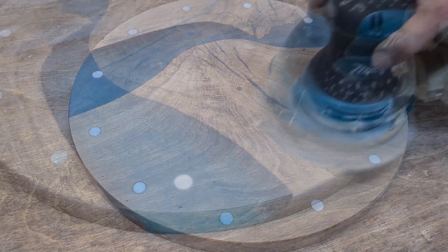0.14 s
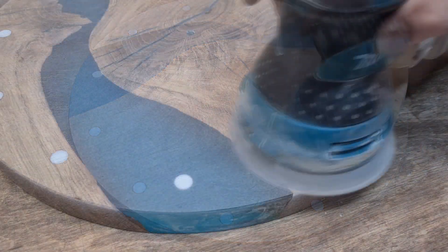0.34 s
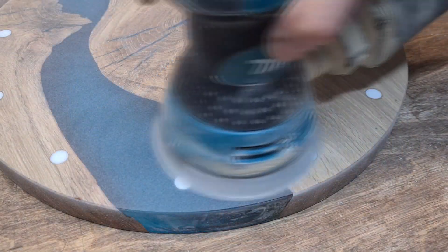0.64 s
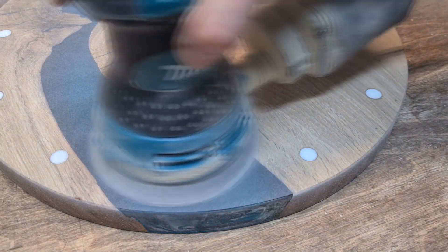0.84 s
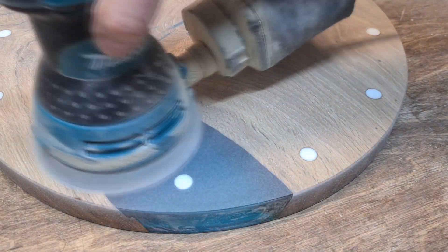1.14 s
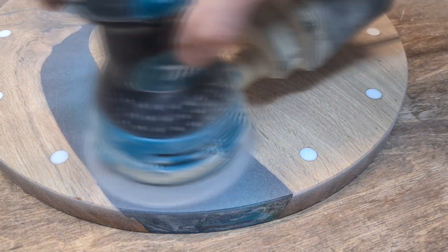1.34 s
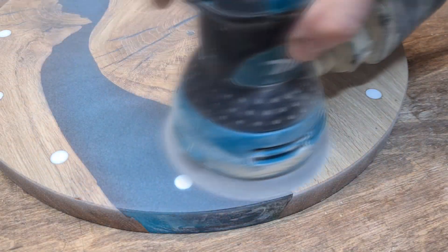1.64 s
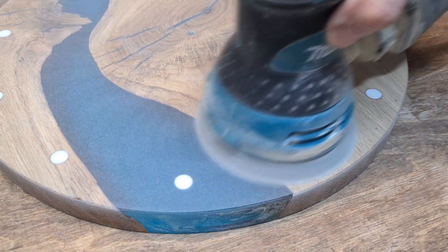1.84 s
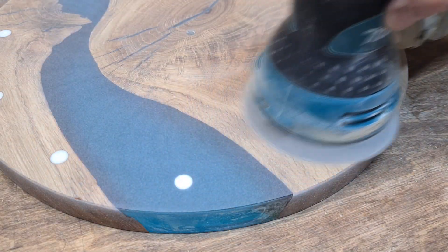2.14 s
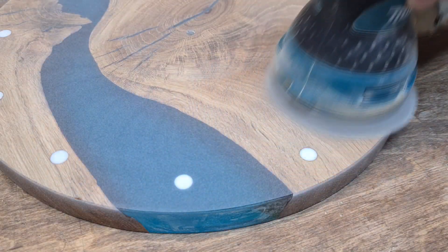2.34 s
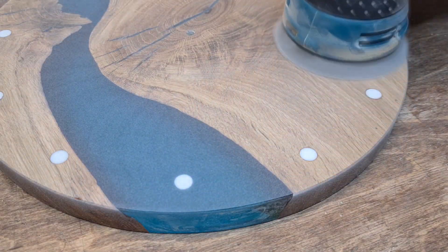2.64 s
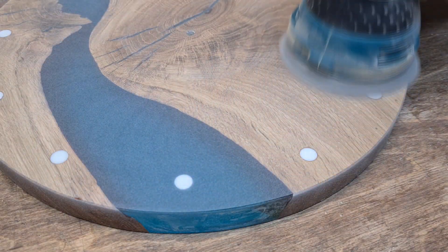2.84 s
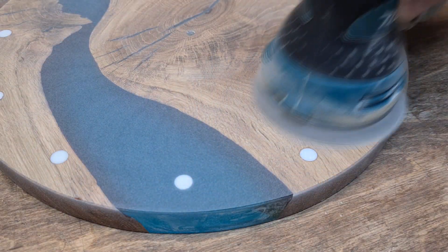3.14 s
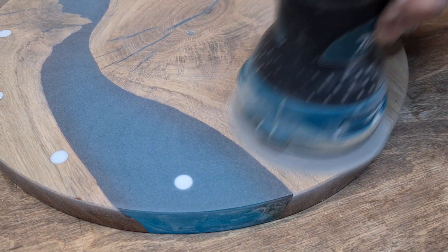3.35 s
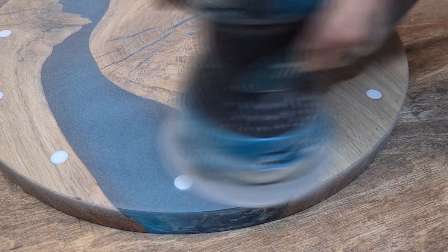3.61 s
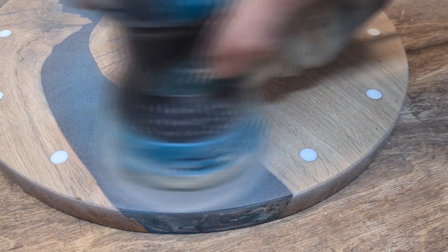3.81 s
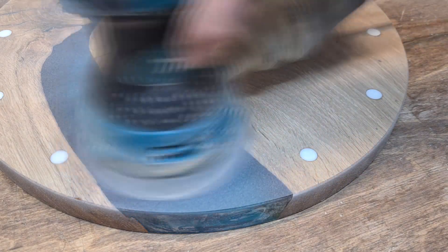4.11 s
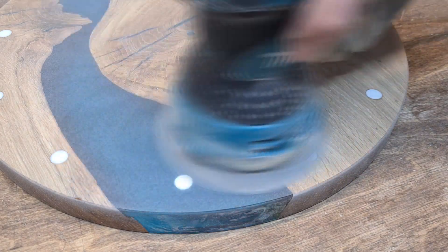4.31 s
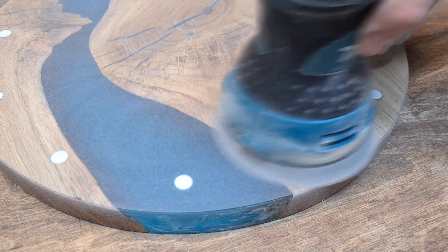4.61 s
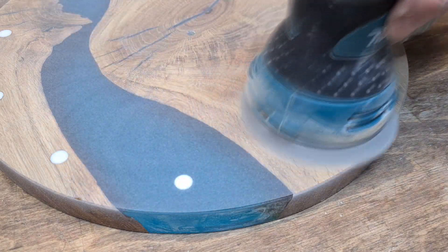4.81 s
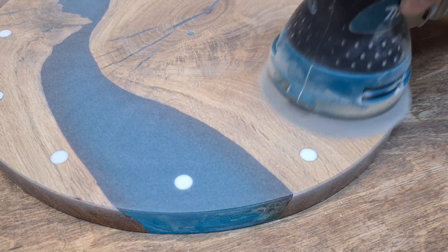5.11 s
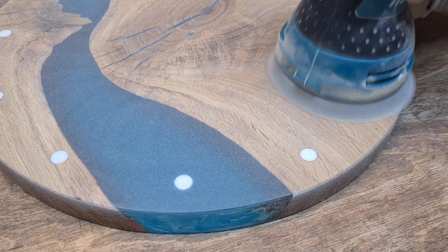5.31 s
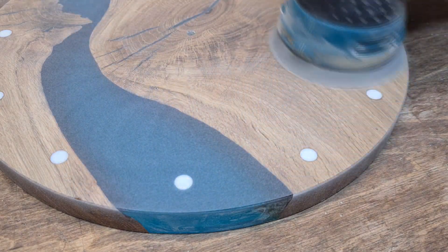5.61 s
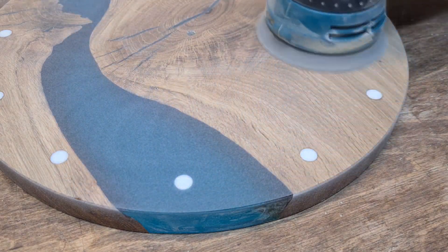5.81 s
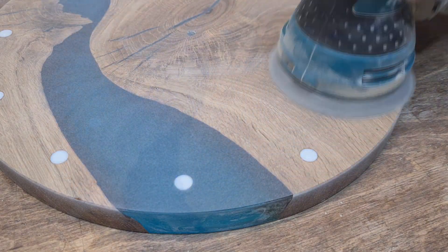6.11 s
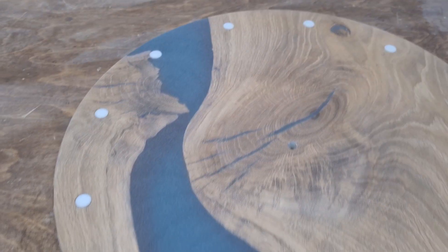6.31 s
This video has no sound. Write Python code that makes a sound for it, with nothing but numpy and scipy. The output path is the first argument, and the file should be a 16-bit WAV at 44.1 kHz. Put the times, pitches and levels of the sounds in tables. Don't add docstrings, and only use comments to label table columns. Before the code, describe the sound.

A handheld electric orbital sander is running from the first instant, close to a stereo microphone on a workshop bench. For the first 0.5 s a slightly slower, lower-pitched layer of the same tool dissolves beneath it, giving a brief beating. Then a steady buzzing hum around 200 Hz continues, with a hard whine near 4.8 kHz, fainter fan tones, fuzzy pad chatter and broad gritty hiss reaching into the treble. Around 1.1 s the tool is at the left and the low hum is strongest; by 2.4-2.8 s it is at the right rim, hissier and leaning right, its pitch sagging very slightly. It sweeps left again around 3.9 s and returns right by 4.8 s. The whine flickers and shifts sides throughout. From 5 s everything fades smoothly, gone by about 6.2 s, leaving a very faint low rumble of a quiet room.

```python
import sys
import numpy as np
from scipy import signal
from scipy.io import wavfile
from scipy.ndimage import uniform_filter1d, map_coordinates

SR = 44100
rng = np.random.default_rng(int(sys.argv[2]) if len(sys.argv) > 2 else 0)


def voltage_ratio(level):
    return 10 ** (np.asarray(level, float) / 20)


def to_wav(sig):
    pcm = np.clip(np.atleast_2d(sig), -1, 1) * 32767
    pcm = np.round(pcm).astype(np.int16)
    wavfile.write(sys.argv[1], SR, pcm.T)


N = 284886
TIME = np.arange(N) / SR

# start_s, place (0 left on the board - 1 right rim)
PLACE_PATH = [(0, 0.74), (.4, 0.54), (1.1, 0.0096), (1.5, 0.24), (2, 0.69), (2.4, 0.86), (2.8, 0.95),
              (3.3, 0.76), (3.9, 0.018), (4.3, 0.43), (4.8, 0.81), (5.3, .98), (6.2, 0.91)]
# place, width (place), gain_db
RESIN_SEAM = (.58, .33, 3.5)


def unit(x):
    return x / np.sqrt(np.mean(x ** 2) + 1e-20)


def along(points, hz):
    f, v = np.transpose(points)
    return np.interp(np.log(hz + 1), np.log(f + 1), v)


def curves(rows):
    s, *cols = np.transpose(rows)
    return [np.interp(TIME, s, c).astype(np.float32) for c in cols]


def wobble(rate_hz):
    draws = rng.standard_normal(int(N * rate_hz / SR) + 4)
    knots = map_coordinates(draws, [TIME[::64] * rate_hz])
    return np.repeat(knots.astype(np.float32), 64)[:N]


def bump(x, centre, width):
    return np.exp(-np.square(np.square(1.8 * (x - centre) / width))).astype(np.float32)


def humps(rows):
    coarse_s = TIME[::64]
    sums = sum(np.outer(heights, bump(coarse_s, s, length_s)) for s, length_s, *heights in rows)
    return np.repeat(sums.astype(np.float32), 64, axis=1)[:, :N]


def gain_of(db):
    return np.repeat(voltage_ratio(db[..., ::16]).astype(np.float32), 16, axis=-1)[..., :N]


def pan(db):
    return voltage_ratio(np.array([db / 2, -db / 2]))


def tone(turns, lead_rad):
    angle = (2 * np.pi * (turns % 1)).astype(np.float32)
    return np.float32(np.sqrt(2)) * np.sin([angle + lead_rad / 2, angle - lead_rad / 2])


def rush(spectrum, patchy_db, seam_db=0):
    # hz, left-right likeness (0-1)
    alike = [(50, .12), (100, .25), (200, 0.76), (600, 0.93), (1400, .45), (3000, 0.17), (7000, 0.15),
             (15000, 0.098)]
    hz, t, z = signal.stft(rng.standard_normal((2, N), dtype=np.float32), SR, nperseg=1024)
    field = uniform_filter1d(rng.standard_normal(z.shape[1:]), size=10, axis=0)
    field = uniform_filter1d(field, size=6, axis=1)
    spot = np.interp(t, *np.transpose(PLACE_PATH))

    seam_place, seam_width, _ = RESIN_SEAM
    seam_hz = 7350 + 2500 * (spot - seam_place)
    seam = bump(spot, seam_place, seam_width) * bump(hz[:, None], seam_hz, 1500)
    z = z * voltage_ratio(along(spectrum, hz)[:, None] + seam_db * seam + patchy_db * unit(field))

    turn = np.arccos(np.clip(along(alike, hz), 0, 1))[:, None] / 2
    shared, own = z[0] * np.cos(turn), z[1] * np.sin(turn)
    lag_s = (-6 + 10.86 * spot) / SR
    late = np.exp(-1j * np.pi * hz[:, None] * lag_s)
    ports = np.array([(shared + own) * late, (shared - own) / late])
    return unit(signal.istft(ports, nperseg=1024)[1][:, :N])


def across(place):
    place_levels = [(0, -49, -39, -32, -39.5), (.35, -46.5, -45, -37.5, -32.5),
                    (.7, -39, -45.5, -39.5, -26.5), (.85, -32.5, -51, -34.5, -26),
                    (1, -27.5, -41.5, -37.5, -29.5)]
    spot, *cols = np.transpose(place_levels)
    return [np.interp(place, spot, c).astype(np.float32) for c in cols]


def rubbing(place):
    # place, width (place), gain_db
    vent_place, vent_width, vent_db = (.79, .2, 2.6)
    seam_place, seam_width, seam_db = RESIN_SEAM
    reach = np.clip(place / 0.61, 0, 1)
    chatter_db = -36 + 1.5 * reach
    scratch_db = -43 + 2.5 * reach
    grit_db = -39.5 + 0.16 * seam_db * bump(place, seam_place, seam_width)
    air_db = -38.5 + vent_db * bump(place, vent_place, vent_width)
    return chatter_db, scratch_db, grit_db, air_db


def hum(turns, place):
    # start_s, order1_db
    shake = [(0.0, -30), (0.3, -22.5), (0.55, -20), (1.29, -20), (1.8, -25.5), (2.3, -27.5), (2.54, -24.5),
             (2.76, -33.5), (3.1, -27), (3.5, -22), (3.97, -20), (4.5, -26), (5.0, -29), (5.7, -29),
             (5.95, -31.5), (6.17, -24.5)]
    # centre_s, length_s, order2_db, order3_db
    rim_rings = [
        (2.5, 0.44, 0.5, 7),
        (3.72, 0.515, 4, -2),
        (4.15, 0.34, 0.5, 2.5),
        (5.45, 0.11, 0, 1.5),
        (5.85, 0.7, -1, 4.5),
    ]
    second_db, third_db = across(place)[:2] + humps(rim_rings)
    side, lead_rad = pan(-.3 - 5.1 * place), -.4 - 0.65 * place

    first_db = curves(shake)[0] + .4 + .5 * wobble(28)
    first = voltage_ratio(first_db) * side * tone(turns + 0.0027 * wobble(20), lead_rad)
    rock_turns = turns - 7.4 * (TIME - 1.92) + .5
    rock = voltage_ratio(-39.5 + .8 * wobble(3)) * side * tone(rock_turns, lead_rad)

    board = voltage_ratio(second_db + 2.73 + 1.2 * wobble(25)) * tone(2 * turns, 0)[0]
    body_db = rubbing(place)[1] - 1.0 - 11.5 * bump(place, 0.94, 0.1) + 1.5 * wobble(12)
    body = voltage_ratio(body_db) * tone(2 * turns, 7.1 * (1.05 - place))[0]
    second = np.array([board + body, board - body])

    third_gain = voltage_ratio(third_db + 2.2 + 1.6 * wobble(20)) * pan(4.5 - 6 * place)
    third = third_gain * tone(3 * turns + 0.04 * wobble(16), 1.2 - 1.5 * place)
    return first + rock + second + third


def whine(turns, place):
    # centre_s, length_s, left_db, right_db
    echoes = [(.08, .2, -9.5, -7), (.38, .15, 0, -28), (.73, .12, -22, -6), (.83, .07, -10.5, 1),
              (.94, .07, -2.5, -15.5), (1.42, .18, -17.5, -7.5), (1.56, .1, 0, 4.5),
              (1.96, .12, -12.5, -5.5), (2.21, 0.074, -2, -8), (2.1, .14, 2.5, -4), (2.32, .12, 0.5, 1),
              (2.44, .06, -11.5, -14), (2.58, .1, -9.5, -9), (2.91, 0.11, -3.5, -5), (3.35, .3, 2, 2),
              (3.66, .08, -5.5, -0.5), (3.82, .1, -15.5, 6), (3.9, .06, -8, -17), (4.18, .12, -23, -1.5),
              (4.5, .1, 7, 1.5), (5.28, .12, -14.5, -6), (5.42, .03, -7, -16), (5.5, .08, -1, 5),
              (5.6, .08, -8, -0.5), (5.79, .05, 2, -7), (5.92, .06, -13, -5), (5.99, 0.064, 2, 6.5),
              (6.13, 0.23, -8, -8), (4.05, .08, -1, -7)]
    # centre_s, length_s, extra_left_lead_rad
    twists = [
        (.48, .25, -1.3),
        (.83, .2, 2.6),
        (1.1, .25, -1.1),
        (1.36, .12, 2.2),
        (1.82, .3, 1),
        (3.85, .1, 1.6),
        (4.1, .15, 2),
        (5.15, .5, .6),
    ]
    left_db, right_db = across(place)[2:] + humps(echoes)
    lead_rad = 7.6 + (2.7 - 7.6) * place + humps(twists)[0]
    level_db = np.array([left_db + .7 * wobble(30), right_db + .7 * wobble(30)])
    return voltage_ratio(level_db) * tone(24 * turns, lead_rad)


def fan(turns, place):
    # centre_s, length_s, swell_db
    swells = [
        [(.42, .4, 4.5), (1.75, 0.79, 7), (2.35, 0.27, 7.5), (2.9, .3, 8.5), (3.45, 0.4, 6), (4.55, 0.7, 8),
         (5.3, .35, 5.5)],
        [(.5, 0.98, 14), (1.04, .12, 11), (1.68, 0.91, 16.5), (2.66, 0.14, 16), (3.05, 0.18, 13),
         (3.45, 0.37, 10.5), (4.4, 0.66, 13.5), (5.3, 0.38, 8.5), (5.85, .2, 12)],
        [(.5, .4, 10), (1.7, 0.47, 9), (2.25, .3, 8.5), (3.62, .2, 10), (4.01, .15, 7), (4.85, .9, 8)],
        [(.64, 0.25, 11.5), (.88, 0.15, 11), (1.27, .16, 14), (1.7, .45, 12.5), (2.38, .15, 10), (2.8, 0.77, 7),
         (3.85, 0.59, 11), (4.28, .2, 10), (5.05, .5, 10.5), (5.85, 0.62, 14)],
    ]
    calm_db = [-47, -52.5, -53, -50]
    # order, pan_left_db, pan_rim_db (left minus right), lead_left_rad, lead_rim_rad
    sides = [(12, 4, -2.5, 2.9, -1), (18, -8, -13, 3.3, -3.5), (23, -19, -13.5, 1, 2), (48, -2, -5, .3, 2)]
    lines = 0
    for db, rows, (order, pan_left, pan_rim, lead_left, lead_rim) in zip(calm_db, swells, sides):
        level_db = db + humps(rows)[0] - 4.0 + 1.8 * wobble(14)
        side = pan(pan_left + (pan_rim - pan_left) * place + 1.5 * wobble(1.5))
        lead_rad = lead_left + (lead_rim - lead_left) * place + 0.72 * wobble(3)
        lines = lines + gain_of(level_db) * side * tone(round(order) * turns, lead_rad)
    return lines


def weak_orders(turns, place):
    # order, left_db, right_db (re scratch level)
    minor_lines = [(3.967, -4, -14.5), (4.996, -11.5, -8), (6, -5, -3.5), (8, -22.5, -8), (9, -7.5, -17.5),
                   (12.5, -6.5, -19.5), (15.94, -9, -6.5), (16.78, -10, -4), (18.93, -26, -13),
                   (19.45, -23, -9.5), (20.45, -14.5, -6), (22, -14.5, -12), (24.6, -14.5, -19.5),
                   (35.4, -20, -30.5), (37.4, -11.5, -12), (47.2, -10, -12), (48.6, -20.5, -21.5),
                   (50, -23, -13)]
    base_db = rubbing(place)[1]
    lines = 0
    for order, left_db, right_db in minor_lines:
        fading_db = 2.5 * np.array([wobble(5), wobble(6.6)])
        shaky = round(2 * order) / 2 * turns + 0.054 * wobble(22)
        gain = gain_of(base_db + fading_db + np.float32([[left_db], [right_db]]))
        lines = lines + gain * tone(shaky, order * -.1 + 0.49 * wobble(3.05))
    return lines


def pad_knocks(turns, place):
    pad_orders = [(1, -8.5), (2, -14.5), (3, -11), (4, -12.5), (5, -13.5), (6, -11), (7, -14), (8, -18.5)]
    slip = turns - np.cumsum(6.2 + 1.426 * wobble(4), dtype=float) / SR
    base_db = rubbing(place)[0]
    knocks = 0
    for order, db in pad_orders:
        fuzzy = round(order) * slip + .1 * np.sqrt(order) * wobble(26)
        gain = gain_of(base_db + db + 4.14 * wobble(24))
        knocks = knocks + gain * tone(fuzzy, -.3 + 0.9 * wobble(6))
    return knocks


def abrasive(turns, place):
    # hz, level_db
    rumble_bands = [(15, -29.5), (30, -24.5), (80, -7), (100, 0), (125, -5.5), (160, 4.5), (200, 2.5),
                    (240, 8), (270, 1.5), (310, -4.5), (480, 0.5), (600, -21.5), (900, -58)]
    chatter_bands = [(250, -59.5), (400, -27), (520, -5.5), (700, -0.5), (1000, 1.5), (1250, 5),
                     (1420, 1.5), (1500, -6.5), (1800, -23.5), (3000, -60.5)]
    scratch_bands = [(1100, -20), (1500, 0.5), (2000, 3), (3000, 1.5), (4300, 1), (5000, 1.5), (5600, -29)]
    grit_bands = [(4400, -20.5), (5200, -2), (6200, -1), (7100, 1), (7700, -3), (8400, -7), (9500, -12),
                  (10600, -32.5)]
    air_bands = [(8000, -22.5), (9300, -4), (11300, -2.5), (12200, 1.5), (14000, -0.5), (15800, -0.5),
                 (16200, -58.5)]
    chatter_db, scratch_db, grit_db, air_db = rubbing(place)
    flutter = wobble(14)
    orbit = 1 + .02 * np.sin(2 * np.pi * turns)

    chatter_gain = voltage_ratio(chatter_db - 1.5 + 0.55 * flutter + 0.74 * wobble(25)) * pan(.3 - 1.0 * place)
    chatter = chatter_gain * rush(chatter_bands, patchy_db=0.5)
    scratch_gain = voltage_ratio(scratch_db + 7.5 + .5 * flutter) * pan(-.5 - 2.17 * place)
    scratch = scratch_gain * rush(scratch_bands, patchy_db=0.88)
    grit_gain = voltage_ratio(grit_db + 6.0 + .5 * flutter) * pan(-.7 - 3 * place)
    grit = grit_gain * rush(grit_bands, patchy_db=0.97, seam_db=RESIN_SEAM[2])
    air_gain = voltage_ratio(air_db + 4.5 + 0.25 * flutter + .3 * wobble(6.6)) * pan(-2.5 - 4.2 * place)
    air = air_gain * rush(air_bands, patchy_db=1.8)
    rumble = voltage_ratio(chatter_db - 12.0) * pan(-.4)[:, None] * rush(rumble_bands, patchy_db=-1.1)
    return orbit * (chatter + scratch + grit + air) + rumble


def earlier_shot():
    # order, left_db, right_db, left_lead_rad, head_start_turns
    earlier_orders = [(1, -29, -22.5, 0.33, 0.65), (2, -47, -32.5, 2.9, 0.61), (18, -42.5, -38.5, -1.7, 0),
                      (24, -39.5, -33.5, 1.3, 0.03), (47, -55.5, -42, 1.8, 0), (48, -48, -45, 1, 0.11)]
    fade = np.clip(1 - (TIME / .5) ** 2, 0, 1)
    turns = 197.6 * TIME
    lines = 0
    for order, left_db, right_db, lead_rad, start in earlier_orders:
        gain = gain_of(0.55 * wobble(17) + [[left_db], [right_db]])
        lines = lines + gain * tone(round(order) * turns + start, lead_rad + 0.56 * wobble(6.9))
    return fade * lines


def room():
    # hz, level_db
    quiet_bands = [(12, -61.5), (22, -25), (43, -1.5), (65, 1), (80, -3), (110, -18), (190, -22),
                   (260, -38), (1000, -43), (4400, -120)]
    fade_in = np.clip((TIME - 6.16) / .08, 0, 1)
    return fade_in * voltage_ratio(-66.0 + 1.5 * wobble(8)) * rush(quiet_bands, patchy_db=-0.5)


def scene():
    # start_s, shaft_turns_per_s
    shaft_speed = [(0.03, 202.23), (0.69, 202.56), (1.13, 202.98), (1.35, 202.75), (1.79, 201.5),
                   (2.23, 200.57), (2.45, 199.87), (2.67, 200.66), (3.33, 200.85), (3.77, 201.62),
                   (3.99, 202.29), (4.21, 202.24), (4.43, 201.47), (5.09, 200.07), (5.53, 198.96),
                   (5.75, 199.3), (5.97, 199.85), (6.13, 198.9)]
    turns = np.cumsum(curves(shaft_speed)[0], dtype=float) / SR
    place, = curves(PLACE_PATH)
    sander = hum(turns, place) + whine(turns, place) + fan(turns, place) + weak_orders(turns, place)
    sander = sander + pad_knocks(turns, place) + abrasive(turns, place) + earlier_shot()
    end_s, fade_s = 6.172, 1.2
    fade_out = np.sin(np.pi / 2 * np.clip((end_s - TIME) / fade_s, 0, 1))
    return sander * fade_out + room()


def top_cut(x):
    return signal.sosfilt(signal.butter(12, 15760, fs=SR, output="sos"), x)


def record(dry):
    return top_cut(dry)


dry = scene()
out = record(dry)
to_wav(out)
```